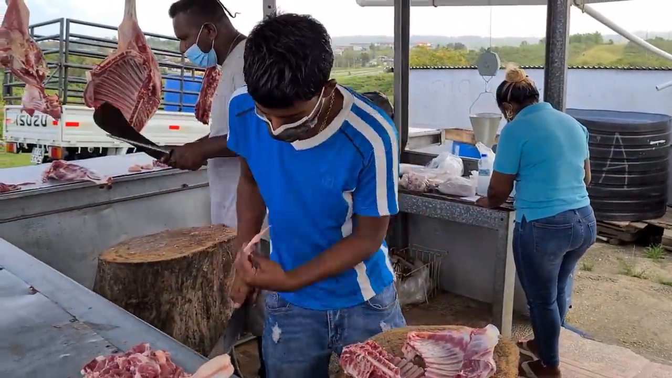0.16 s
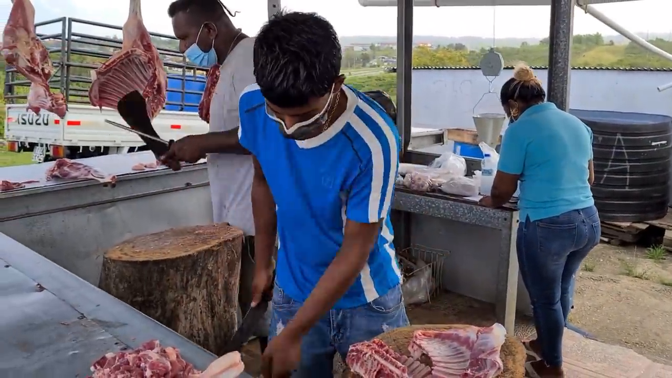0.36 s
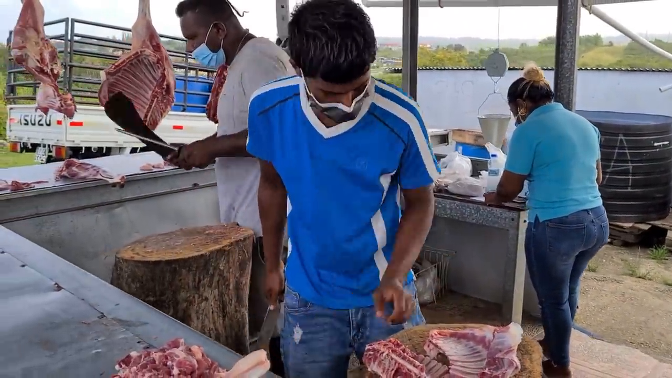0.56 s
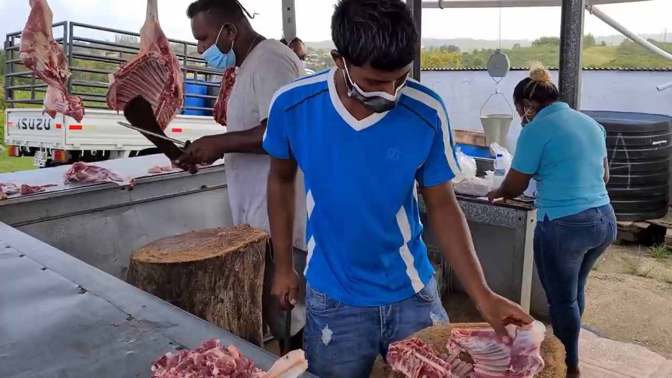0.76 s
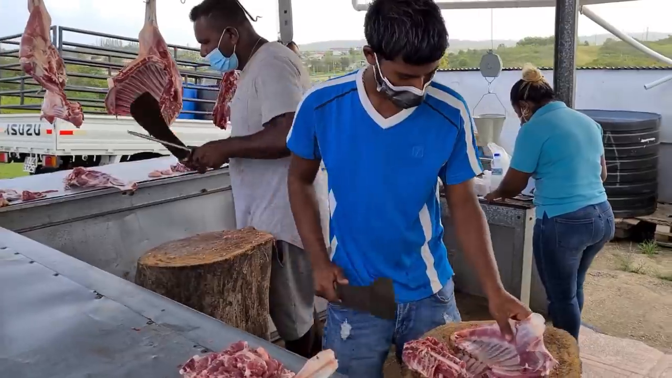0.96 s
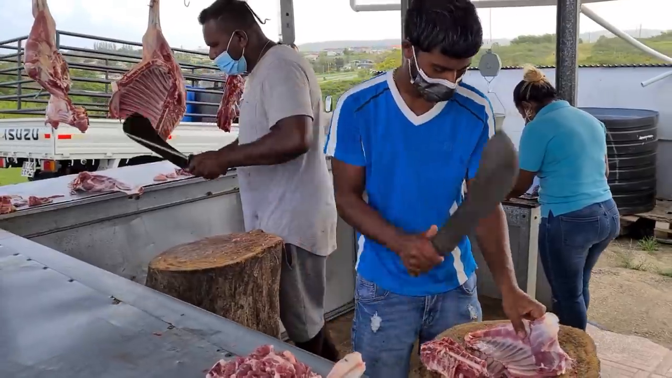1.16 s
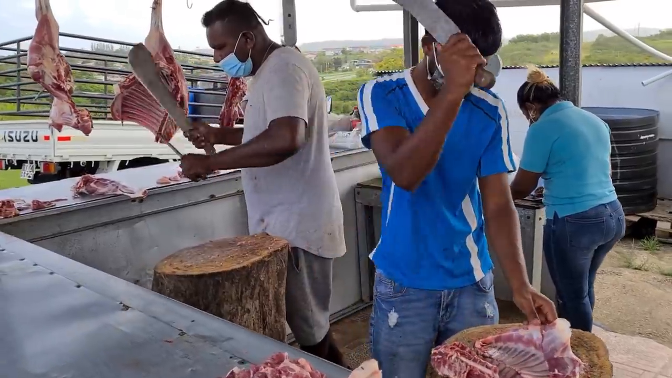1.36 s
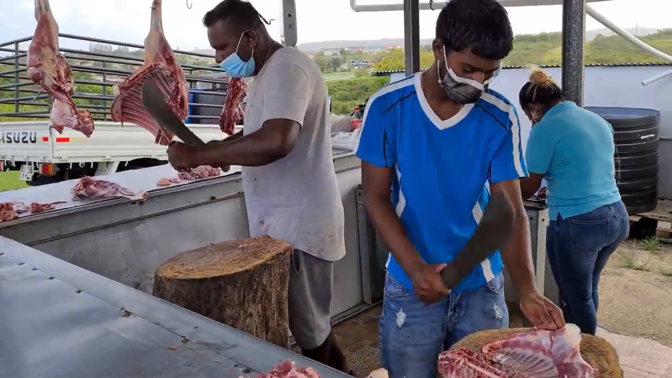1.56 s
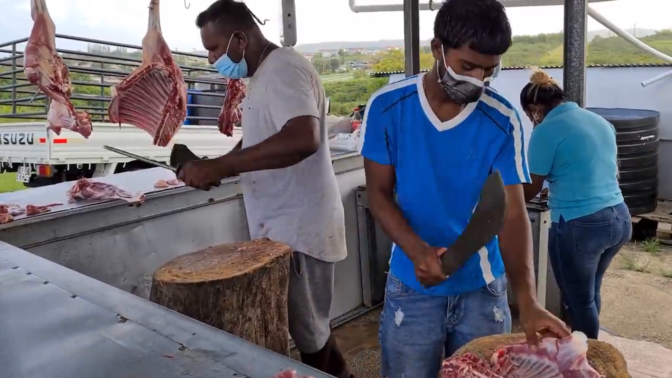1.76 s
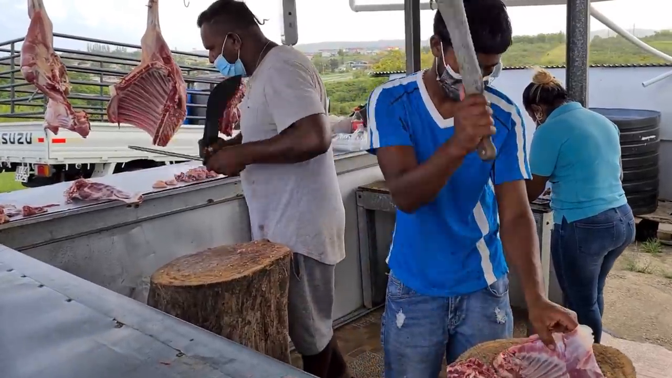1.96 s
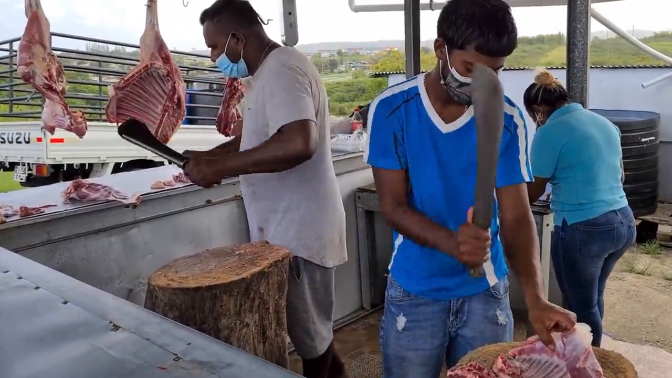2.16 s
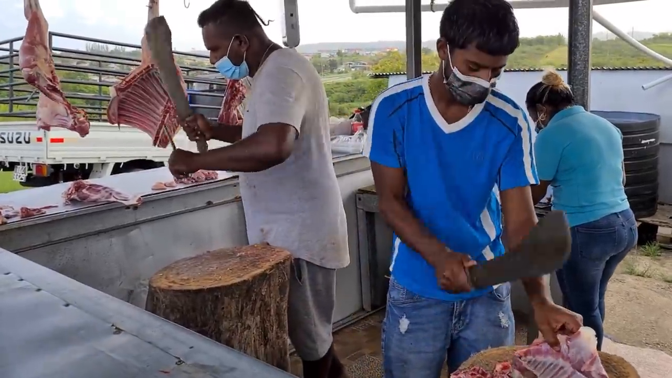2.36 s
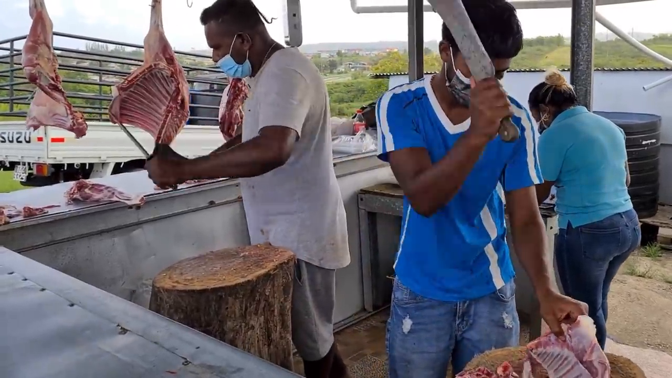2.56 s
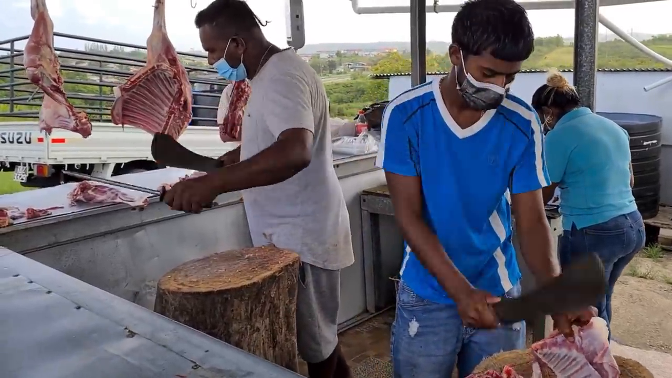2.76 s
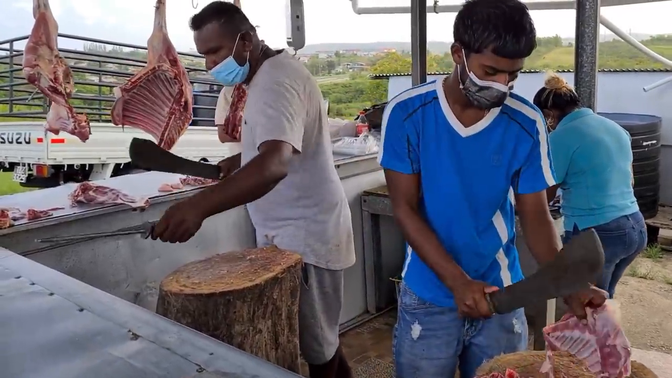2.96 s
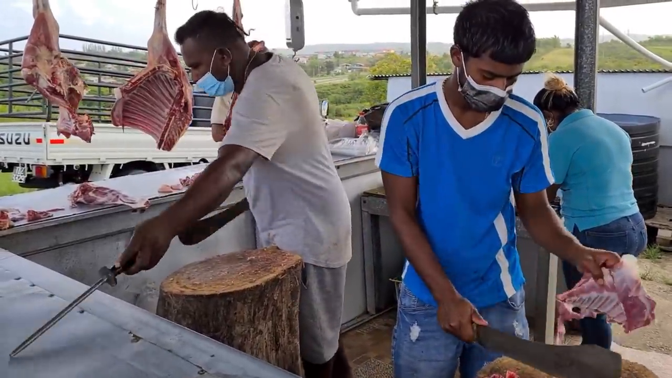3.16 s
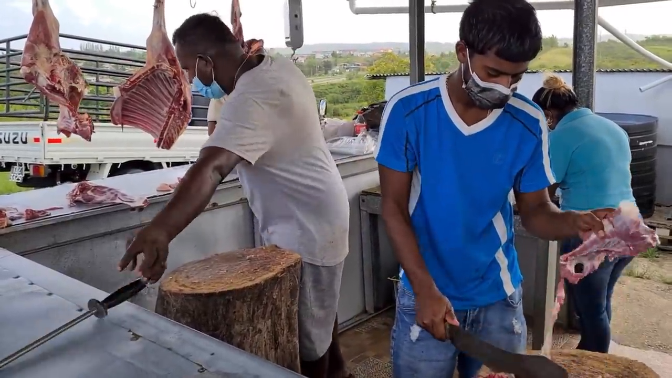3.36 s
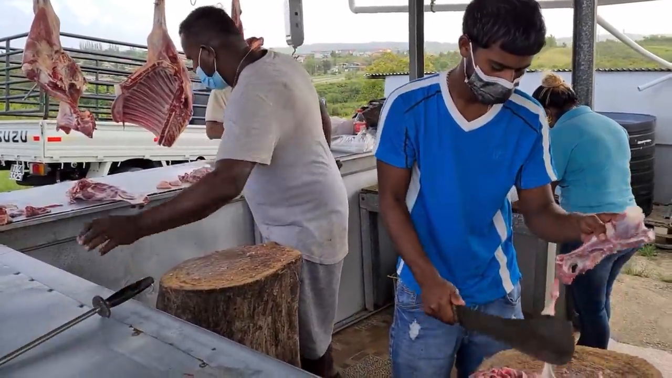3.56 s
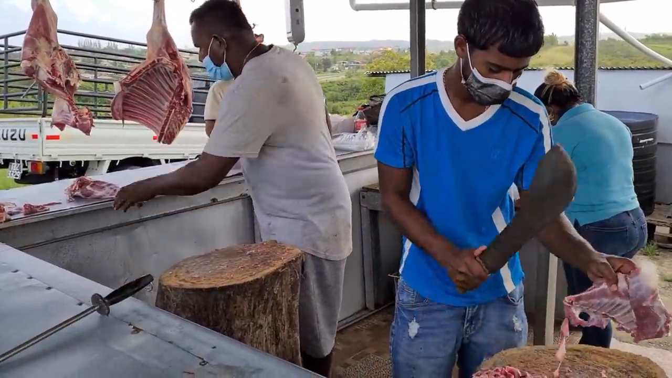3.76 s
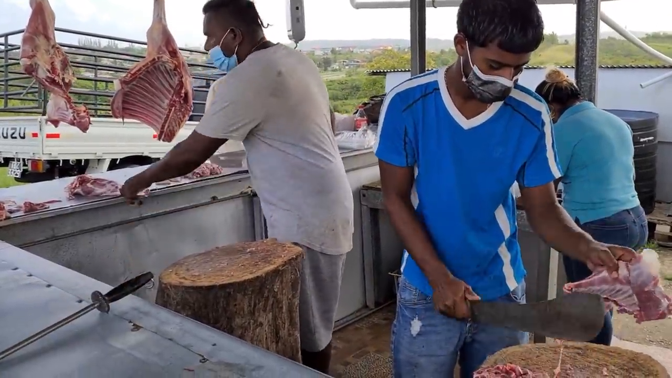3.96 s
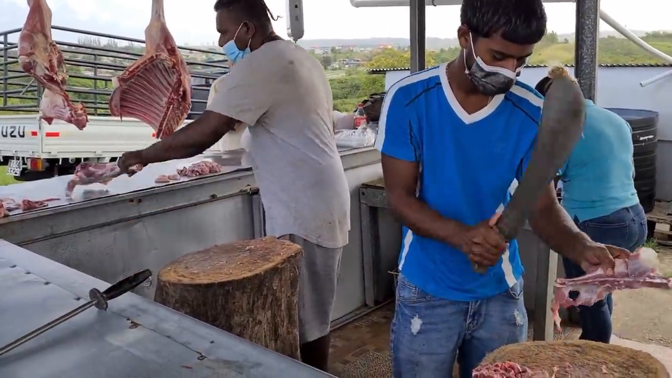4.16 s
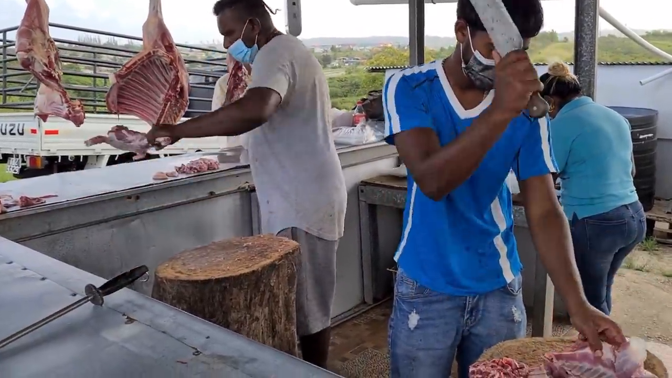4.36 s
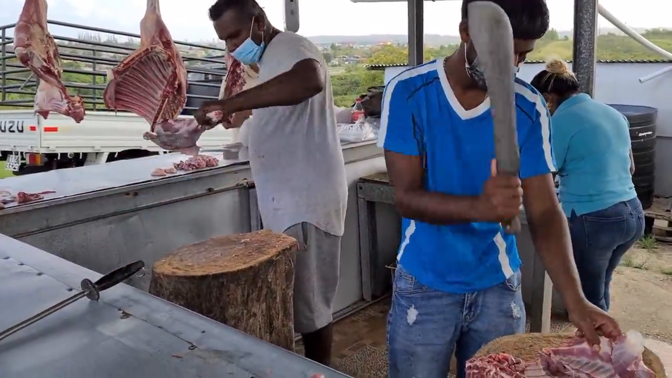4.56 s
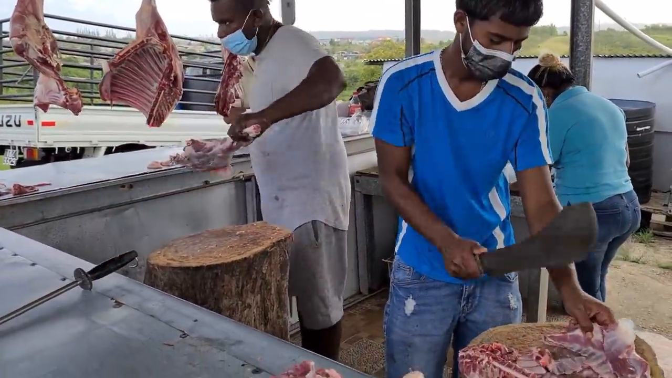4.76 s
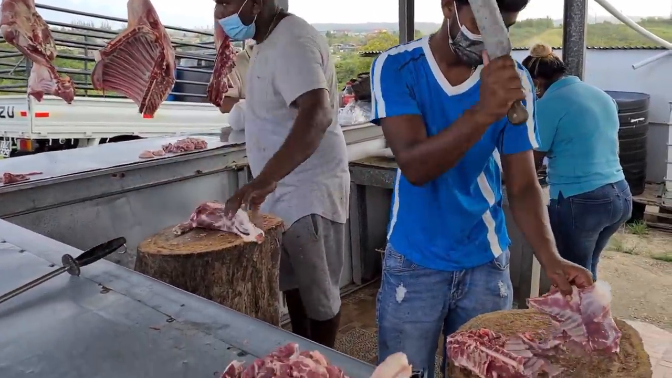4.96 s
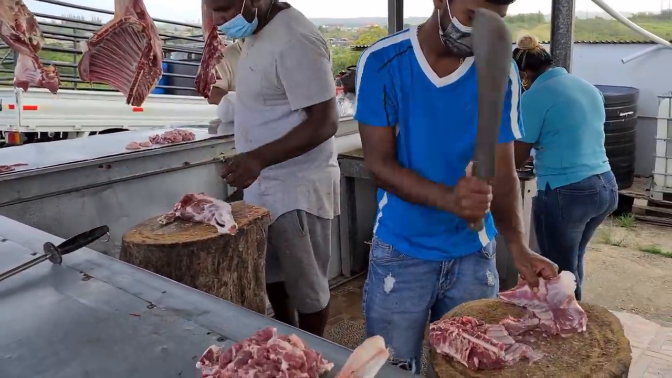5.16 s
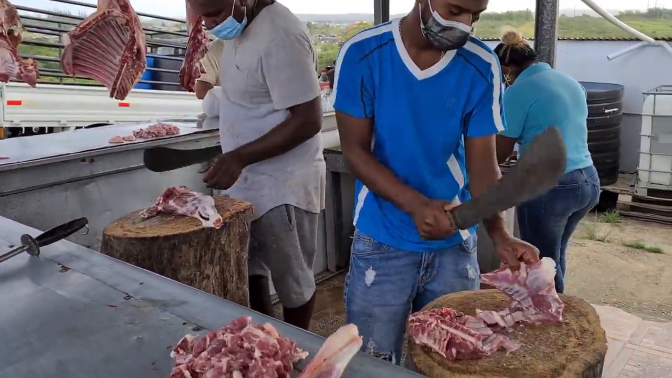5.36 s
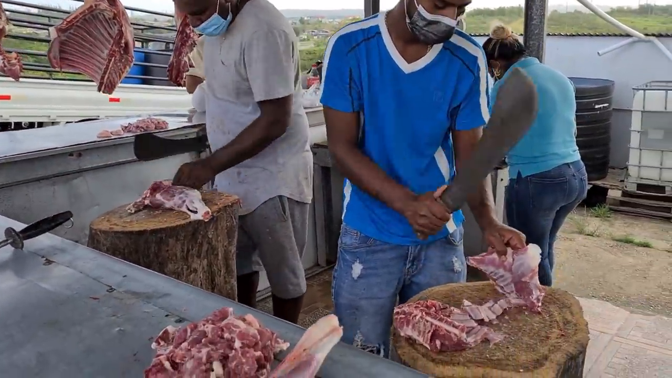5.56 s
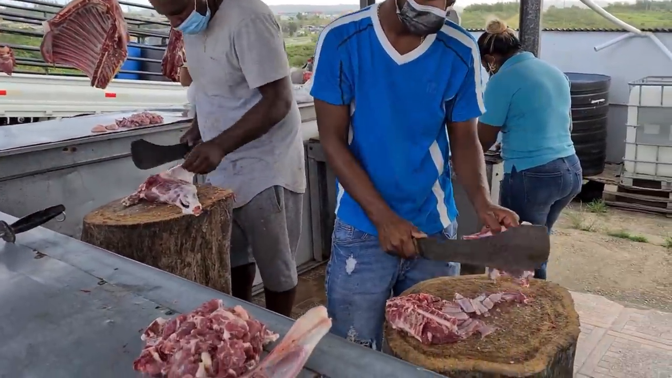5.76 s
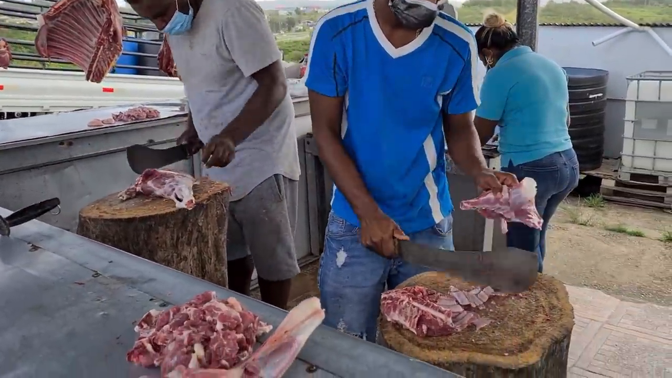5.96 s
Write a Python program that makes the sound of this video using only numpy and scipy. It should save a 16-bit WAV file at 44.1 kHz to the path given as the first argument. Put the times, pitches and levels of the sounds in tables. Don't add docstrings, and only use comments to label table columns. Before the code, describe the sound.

Outdoors under a tin roof, tyre roar and low rumble run throughout, with a low engine idle near 84 Hz weakening and gone by 1.9 s. From the start a farther butcher hones a cleaver: gritty, singing scrapes alternate with ringing slaps at about 0.24, 0.63, 1.02, 1.57, 2.12 and 2.52 s. Loud close chops crack bone on a wooden stump at 1.65, 2.28 and 2.84 s, with knock, thud and brief crunch. At 3.23 s a steel rod clangs onto a sheet-metal counter, bounces, lands again at 3.43 and rattles to rest by 3.53, booming hollowly as traffic swells and a car passes around 3.8. Near chops return at 3.97, 4.73, 5.32 and a weaker 5.73 s, some preceded by a tiny wet slice. A farther cleaver cracks lightly at 4.41 and fully at 5.01. Meat rustles faintly; traffic recedes by 6 s.

```python
import sys
import numpy as np
from scipy import signal
from scipy.fft import rfft, irfft, next_fast_len
from scipy.io import wavfile
from scipy.ndimage import uniform_filter1d, map_coordinates

SR = 44100
rng = np.random.default_rng(int(sys.argv[2]) if len(sys.argv) > 2 else 0)


def elevation(decibels):
    levels = np.asarray(decibels, float)
    return 10 ** (levels / 20)


def to_wav(sig):
    pcm = np.clip(np.atleast_2d(sig), -1, 1) * 32767
    pcm = np.round(pcm).astype(np.int16)
    wavfile.write(sys.argv[1], SR, pcm.T)


N = 265482
PORT_GAP = 0.16
SOUND_SPEED = 343


def unit(x):
    return x / np.sqrt(np.mean(x ** 2) + 1e-20)


def along(points, hz):
    f, v = np.transpose(points)
    return np.interp(np.log(hz + 1), np.log(f + 1), v)


def curves(rows):
    s, *cols = np.transpose(rows)
    return [np.interp(np.arange(N) / SR, s, c) for c in cols]


def wobble(rate):
    knots = rng.standard_normal(int(N * rate / SR) + 4)
    return map_coordinates(knots, [np.arange(N) * rate / SR])


def filtered(x, response):
    m = next_fast_len(x.shape[-1] + 8192)
    return irfft(rfft(x, m) * response(np.fft.rfftfreq(m, 1 / SR)), m)[..., :x.shape[-1]]


def resonances(modes):
    def response(f):
        return sum((-1) ** k * elevation(db) * 1j * f * w / (c * c - f * f + 1j * f * w)
                   for k, (c, w, db) in enumerate(modes))
    return response


def diffuse(seconds, likeness, gain):
    size = round(seconds * SR)
    hz, t, (a, b) = signal.stft(rng.standard_normal((2, size)), SR, nperseg=512)
    turn = np.arccos(np.clip(likeness(hz), -1, 1))[:, None] / 2
    common, apart = np.cos(turn) * a, np.sin(turn) * b
    pair = np.array([common + apart, common - apart])
    return signal.istft(pair * gain(hz[:, None], t), SR, nperseg=512)[1][:, :size]


def spaced(hz):
    return np.sinc(2 * hz * PORT_GAP / SOUND_SPEED)


# frequency in Hz, t60 in seconds.
ROOF_DECAY = [(120, 0.58), (600, 0.33), (1800, 0.27), (5000, 0.24), (13000, 0.21)]


def add(out, s, dry, left_lag, wet_db):
    tail = diffuse(0.36, spaced, lambda hz, t: elevation(-60 * t / along(ROOF_DECAY, hz)))
    tail[:, :round(.003 * SR)] = 0
    tail = elevation(wet_db) * tail / np.linalg.norm(tail[0])
    delay = 0.0012 + 0.027 * rng.random(7)
    side = PORT_GAP / SOUND_SPEED / 2 * SR * rng.uniform(-1, 1, 7)
    for port, sign in enumerate((1, -1)):
        tail[port, (delay * SR + sign * side).astype(int)] += elevation(-7.0 - 380 * delay)
    heard = signal.fftconvolve(dry[None], tail, axes=1)
    shift = lambda hz: np.exp(-1j * np.pi * hz * left_lag * np.array([[1], [-1]]))
    heard[:, :len(dry)] += filtered(np.array([dry, dry]), shift)
    start = round(s * SR)
    heard = heard[:, :N - start]
    out[:, start:start + heard.shape[1]] += heard


def grains(size, rate, spread_db):
    hits = rng.random(size) < rate / SR
    return unit(hits * rng.standard_normal(size) * elevation(spread_db * rng.standard_normal(size)))


# frequency in Hz, left-right likeness from -1 to 1.
STREET_LIKENESS = [(30, 0.35), (60, 0.4), (150, 0.94), (380, 0.75), (950, -0.037), (2380, -0.23),
                   (5980, 0.37), (15000, 0.33)]


def rush(spectrum, patchy_db):
    def patches(hz, t):
        field = rng.standard_normal((len(hz), len(t)))
        field = uniform_filter1d(field, size=5, axis=0)
        field = uniform_filter1d(field, size=12, axis=1)
        return elevation(patchy_db * unit(field))
    wide = diffuse(N / SR, lambda hz: along(STREET_LIKENESS, hz), patches)
    return unit(filtered(wide, lambda hz: elevation(along(spectrum, hz))))


# time in seconds, tyre roar in dB.
TRAFFIC_SWELL = [(0.0, -25.5), (0.7, -27.5), (1.3, -29), (1.8, -30.5), (2.5, -33), (3.15, -34), (3.35, -27),
                 (3.6, -27.5), (3.8, -27.5), (3.95, -27), (4.1, -32), (4.35, -30.5), (4.62, -29),
                 (4.9, -32), (5.4, -35.5), (6.02, -39)]
# frequency in Hz, level in dB per Hz.
RUMBLE_SPECTRUM = [(12, -56.5), (20, -11.5), (69, 9), (89, 0.5), (146, -8.5), (260, -8), (340, -42.5),
                   (570, -120)]
TYRE_SPECTRUM = [(88, -22.5), (150, -2), (216, -9.5), (293, -6), (822, -7), (894, -5), (1100, -4),
                 (1950, -9.5), (2470, -21.5), (3310, -25.5), (4200, -50.5), (5460, -50), (9240, -120)]
HISS_SPECTRUM = [(1760, -20), (3000, -4), (3570, -8), (4570, -16), (5140, -18.5), (9330, -19),
                 (16000, -30.5)]
TREAD_SPECTRUM = [(300, -59), (560, -19.5), (760, -1), (1000, 1), (1400, -8.5), (2600, -60.5)]
# closest approach in seconds, time to fall to half in seconds, level in dB.
PASSING_CARS = [
    (1.95, 0.21, -38.5),
    (3.78, .2, -27.5),
]
ROAD_MEAN_DB = -30
RUMBLE_DB, RUMBLE_GROWS = -27.5, 0.39
HISS_DB, HISS_GROWS = -51, 1.7


def road():
    tyres_db, = curves(TRAFFIC_SWELL)
    swell_db = tyres_db - ROAD_MEAN_DB
    rumble_db = RUMBLE_DB + RUMBLE_GROWS * swell_db + 1.6 * wobble(6) + 0.49 * wobble(37)
    rumble = elevation(rumble_db) * rush(RUMBLE_SPECTRUM, patchy_db=-1.26)
    tyres = elevation(tyres_db + 0.45 * wobble(5.17)) * rush(TYRE_SPECTRUM, patchy_db=1.8)
    hiss_db = HISS_DB + HISS_GROWS * swell_db + 0.82 * wobble(4)
    hiss = elevation(hiss_db) * rush(HISS_SPECTRUM, patchy_db=1.5)
    t = np.arange(N) / SR
    passing = sum(elevation(db) / (1 + ((t - s) / half) ** 2) for s, half, db in PASSING_CARS)
    return rumble + tyres + hiss + passing * rush(TREAD_SPECTRUM, patchy_db=1.5)


# time in seconds, firing rate in Hz, level in dB.
IDLE = [(0.0, 83.5, -22), (.25, 83.9, -24), (.7, 84.27, -29.5), (1.2, 84.16, -31), (1.55, 83.35, -33),
        (1.9, 81.6, -45.5)]
# multiple of the firing rate, level in dB.
FIRING_ORDERS = [(1, 3), (1.5, -3), (2, -25), (2.5, -13), (3, -9.5), (4, -23.5)]


def engine():
    firing_hz, level_db = curves(IDLE)
    turns = np.cumsum(firing_hz * (1 + 0.003 * wobble(9))) / SR
    lead = 0.018 * np.array([[1], [-1]]) + 0.012 * np.array([wobble(3.6), wobble(3.6)])
    hum = 0
    for order, db in FIRING_ORDERS:
        strength = elevation(db + 1.5 * wobble(11.83))
        hum = hum + strength * np.sin(2 * np.pi * (order * turns + rng.random() + lead))
    gone = np.clip((IDLE[-1][0] - np.arange(N) / SR) / 0.12, 0, 1)
    return np.sqrt(2) * elevation(level_db) * gone * hum


# start in seconds, length in seconds, level in dB.
MEAT_SHIFTS = [
    (3.354, 0.073, -44.5),
    (4.14, .08, -54.5),
    (5.58, 0.062, -62),
    (5.85, 0.099, -62.5),
]


def rustles(out):
    for s, length, db in MEAT_SHIFTS:
        t = np.arange(round(length * SR)) / SR
        sticky = filtered(grains(size=len(t), rate=3000, spread_db=0.5), resonances([(6540, 9000, 0)]))
        add(out, s, elevation(db) * np.sin(np.pi * t / length) * unit(sticky), left_lag=.0002, wet_db=0.5)


# start in seconds, length in seconds, level in dB, squeak in Hz.
MEAT_CUTS = [
    (2.825, .011, -42, 3600),
    (3.952, .013, -39, 4000),
    (4.705, 0.027, -30.5, 4570),
    (5.002, 0.0079, -26.5, 4000),
    (5.294, 0.011, -26, 3840),
    (5.71, .015, -41, 3980),
]


def slices(out):
    for s, length, db, squeak_hz in MEAT_CUTS:
        t = np.arange(round(length * SR)) / SR
        wet = filtered(grains(size=len(t), rate=9000, spread_db=2),
                       resonances([(squeak_hz, 1100, 0), (8000, 7000, -13)]))
        add(out, s, elevation(db) * (t / length) ** 1.5 * unit(wet), left_lag=.0002, wet_db=-3)


# frequency in Hz, level under scrape in dB, level under clash in dB, t60 in seconds.
ROD_MODES = [(2630, -16.5, 2, 0.0091), (4430, -7, -17, 0.095), (5490, -10, -30, .04),
             (6320, -13, -27.5, .04), (8310, -3.5, -26, 0.034), (8450, -4.5, -12.5, 0.015),
             (9800, -6.5, -23, 0.059), (11100, -6.5, -25.5, 0.024)]
# frequency in Hz, level in dB per Hz.
GRIT_SPECTRUM = [(760, -44.5), (1300, -19.5), (1850, -6), (2470, -6.5), (2770, -5.5), (3890, -4),
                 (4360, -10.5), (7310, -6), (8990, 2.5), (10800, -8.5), (12100, -3.5), (15400, -9.5)]


def stroke(out, s, rise, length, scrape_db, clash_db, blade_hz):
    t = np.arange(SR // 4) / SR
    release = np.clip((length - t) / .01 + 1, 0, 1) ** 2
    pressure = np.clip(t / rise, 0, 1) ** 1.7 * release
    rasp = map_coordinates(rng.standard_normal(99), [t * 160])
    grit = elevation(1.4 * rasp) * grains(size=len(t), rate=9000, spread_db=3.5)
    modes = ROD_MODES + [(blade_hz, -11, -1, .08), (blade_hz * 1.065, -12, -4, .05)]
    driven = [(hz * rng.normal(1, 0.0098), 6.9 / t60, db + rng.normal(0, 1)) for hz, db, _, t60 in modes]
    sing = filtered(grit, resonances(driven))
    sliding = np.interp(t * (1 + rng.uniform(.6, 2.2) * (t - length / 2)), t, sing)
    colour = lambda hz: elevation(along(GRIT_SPECTRUM, hz))
    scrape = unit(filtered(grit, colour)) + elevation(-0.6) * unit(sliding)
    moving_echo = np.interp(t - .0005 - rng.uniform(.002, .005) * t, t, scrape)
    ring = 0
    for hz, _, db, t60 in modes:
        decay = elevation(db + rng.normal(0, 1) - 60 * t / t60)
        ring = ring + decay * np.sin(2 * np.pi * hz * rng.normal(1, 0.0082) * t)
    tick = elevation(6.5 - 60 * t / 0.007) * filtered(rng.standard_normal(len(t)), colour)
    drawn = elevation(scrape_db) * pressure * unit(scrape + .5 * moving_echo)
    add(out, s, drawn + elevation(clash_db) * (ring + tick), left_lag=-.00016, wet_db=1.5)


# start in seconds, blade note in Hz, scrape in dB, clash in dB,
# contact in seconds.
CLASHED_STROKES = [
    (0.2435, 1786, -13, -16, 0.041),
    (0.6304, 1687, -14.5, -19.5, .047),
    (1.0213, 1730, -15.5, -14.5, 0.041),
    (1.571, 1822, -20.5, -9.5, .045),
    (2.1206, 1733, -15, -13, 0.018),
    (2.5201, 1784, -30.5, -14, 0.028),
]
# start in seconds, rise in seconds, scrape in dB, blade note in Hz.
EASED_STROKES = [
    (0.0, 0.02, -13.5, 1636),
    (0.376, 0.037, -15, 1683),
    (0.765, 0.032, -13.5, 1728),
    (1.15, 0.037, -12.5, 1650),
    (1.59, 0.015, -20, 1750),
    (2.159, 0.024, -14, 1526),
    (2.545, 0.015, -24, 1240),
]
DRAG_HOLD_S = 0.042


def honing(out):
    for s, blade_hz, scrape_db, clash_db, contact in CLASHED_STROKES:
        stroke(out, s, .001, contact, scrape_db, clash_db, blade_hz)
    for s, rise, scrape_db, blade_hz in EASED_STROKES:
        stroke(out, s, rise, rise + DRAG_HOLD_S, scrape_db, -60, blade_hz)


# contact in seconds, clang in dB, boom in dB, panel knock over boom in dB.
ROD_CONTACTS = [
    (3.2259, 1.5, -8.5, 5),
    (3.2558, -3.5, -12, 4.5),
    (3.4349, -3, -19.5, -1.8),
    (3.4425, -2.5, -13, -5.5),
    (3.4693, -35, -12, 1),
    (3.4879, -23.5, -28.5, 2.5),
    (3.5277, -31, -20.5, 3),
]
# frequency in Hz, level in dB per Hz.
SHEET_SPECTRUM = [(68, -18.5), (115, -6), (304, -4), (358, -4), (552, -4), (785, -11.5), (1580, -5.5),
                  (1790, -15), (3000, -17), (4630, -27.5), (14100, -39), (16000, -50)]
# frequency in Hz, t60 in seconds.
SHEET_DECAY = [(120, 1), (500, 0.82), (1500, 0.27), (5000, 0.28)]
# frequency in Hz, level in dB, t60 in seconds.
PANEL_MODES = [(122.4, 0.5, 0.27), (176, 2.5, 0.12), (207.5, -1.5, 0.085), (252, 3.5, 0.12),
               (302, -1, 0.12), (550, -6, .09), (615, -9, 0.22), (1616, -2.5, .08)]
# frequency in Hz, level in dB.
EDGE_SPECTRUM = [(400, -24), (1000, 0.5), (3000, -3), (6000, -12.5), (10000, -10), (14000, -12.5),
                 (16500, -37.5)]


def counter(out):
    t = np.arange(SR) / SR
    ringing = lambda hz, t: elevation(along(SHEET_SPECTRUM, hz) - 60 * t / along(SHEET_DECAY, hz))
    for s, clang_db, boom_db, knock_db in ROD_CONTACTS:
        boom = diffuse(1, np.ones_like, ringing)[0]
        boom = boom / np.sqrt(np.mean(boom[:SR // 30] ** 2)) * (1 - np.exp(-t / 0.0005))
        knock = sum(elevation(db + rng.normal(0, 1) - 60 * t / t60) * np.sin(2 * np.pi * hz * t)
                    for hz, db, t60 in PANEL_MODES)
        burst = elevation(-60 * t / 0.14) * rng.standard_normal(SR)
        clang = filtered(burst, lambda hz: elevation(along(EDGE_SPECTRUM, hz)))
        body = elevation(boom_db - 9.0) * (boom + elevation(knock_db) * knock)
        add(out, s, body + elevation(clang_db - 7.0) * clang, left_lag=-0.00014, wet_db=-5.5)


# time in seconds, crack in dB, knock in dB, knock in Hz, thud in dB.
FAR_CHOPS = [
    (4.4117, -21.5, -57, 2870, -49),
    (4.44, -26, -40, 3350, -38),
    (5.0094, -1.5, -24, 2955, -30),
    (5.015, -37.5, -42, 1457, -20.5),
]
NEAR_CHOPS = [
    (1.6491, 4.5, -15, 1483, -21.5),
    (1.669, -27.5, -17.5, 1280, -34.5),
    (2.2826, 3.5, -16.5, 721, -38),
    (2.8437, 4.5, -17, 1760, -20.5),
    (3.9692, -1, -15, 1378, -22),
    (4.7317, 2.5, -22.5, 1517, -24.5),
    (5.317, 4.5, -53, 1204, -25),
    (5.7274, -7.5, -15.5, 1554, -21),
]
# frequency in Hz, width in Hz, level in dB.
FAR_STUMP_MODES = [(213, 93, -14), (406, 90, 5.5), (510, 160, 4.5), (1100, 300, 1)]
NEAR_STUMP_MODES = [(141.7, 17, 1.5), (202.2, 12, 0), (302, 39, 3), (511, 380, -30)]
# frequency in Hz, level in dB per Hz.
BONE_SPECTRUM = [(180, -34), (300, 0.5), (656, -15), (1390, -2), (3460, -18), (4990, -25.5), (9090, -17.5),
                 (14500, -45), (16000, -67.5)]
NEAR_CRUNCH, FAR_CRUNCH = (-24, 0.63), (-43.5, -0.031)
KNOCK_PARTIALS = [(1, 0), (.45, -13), (.72, -5), (1.22, -7), (2.2, -20)]  # multiple, dB


def chops(out, blows, stump, crunch, left_lag, wet_db):
    t = np.arange(SR // 4) / SR
    swell = lambda tau: (t / tau) * np.exp(1 - t / tau)
    for s, crack_db, knock_db, knock_hz, thud_db in blows:
        crunch_db = crunch[0] + crunch[1] * crack_db
        snap = (np.arange(len(t)) == 26) + .045 * swell(.002) * rng.standard_normal(len(t))
        crack = elevation(crack_db + 18.0) * filtered(snap, lambda hz: elevation(along(EDGE_SPECTRUM, hz)))
        tones = sum(elevation(db) * np.sin(2 * np.pi * k * knock_hz * t) for k, db in KNOCK_PARTIALS)
        knock = elevation(knock_db + 11.5) * tones * swell(.0013)
        modes = [(hz * rng.normal(1, 0.017), w, db + rng.normal(0, 1.1)) for hz, w, db in stump]
        thud = filtered(swell(0.0016), resonances(modes))
        thud = elevation(thud_db + 10) * thud / abs(thud).max()
        clicks = grains(size=len(t), rate=1800, spread_db=4.0)
        splinters = unit(filtered(clicks, lambda hz: elevation(along(BONE_SPECTRUM, hz))))
        splinters = elevation(crunch_db) * splinters * swell(0.018)
        add(out, s, crack + knock + thud + splinters, left_lag, wet_db)


def scene():
    out = road() + engine()
    rustles(out)
    slices(out)
    honing(out)
    counter(out)
    chops(out, FAR_CHOPS, FAR_STUMP_MODES, FAR_CRUNCH, left_lag=-0.000093, wet_db=-11.0)
    chops(out, NEAR_CHOPS, NEAR_STUMP_MODES, NEAR_CRUNCH, left_lag=.0002, wet_db=-3.5)
    return out


def band_limit(x):
    return signal.sosfilt(signal.butter(12, 16510, fs=SR, output="sos"), x)


def record(dry):
    thinned = filtered(dry, lambda hz: (1j * hz / (28 + 1j * hz)) ** 2)
    clipped = thinned / (1 + abs(thinned / .85) ** 6) ** (1 / 6)
    limited = filtered(clipped, lambda hz: 1 / np.sqrt(1 + (hz / 15900) ** 60))
    return band_limit(limited)


dry = scene()
out = record(dry)
to_wav(out)
```